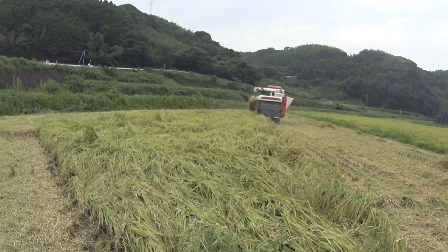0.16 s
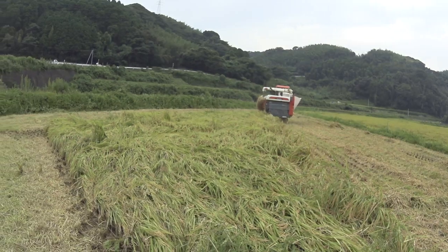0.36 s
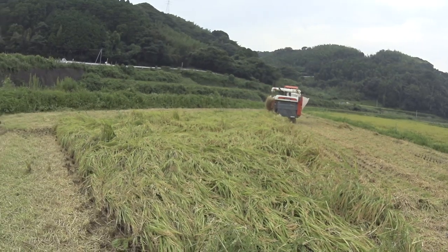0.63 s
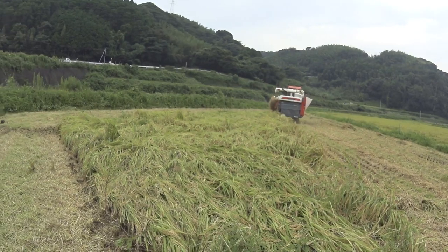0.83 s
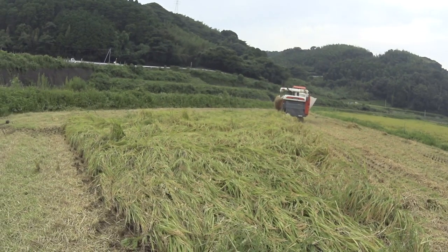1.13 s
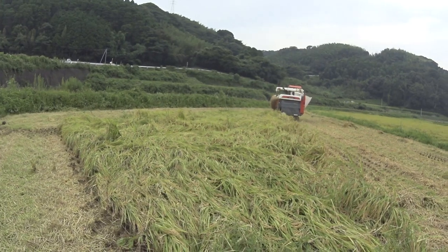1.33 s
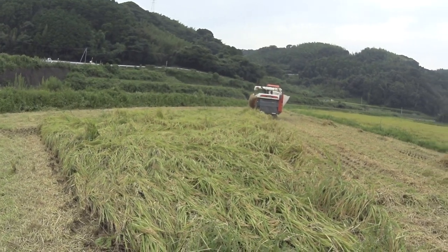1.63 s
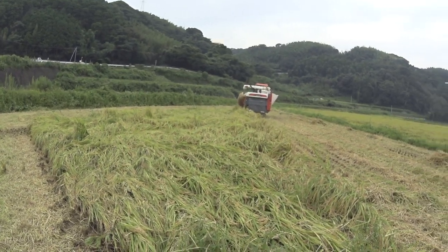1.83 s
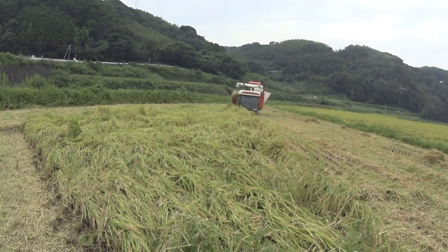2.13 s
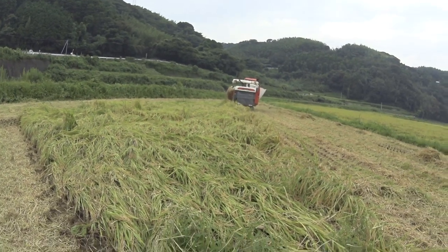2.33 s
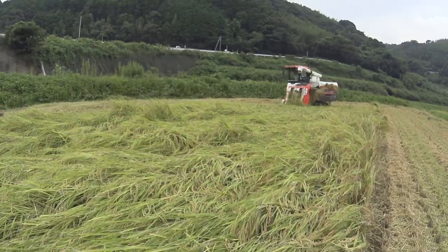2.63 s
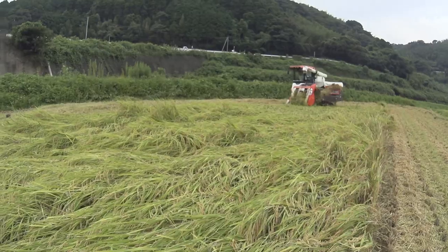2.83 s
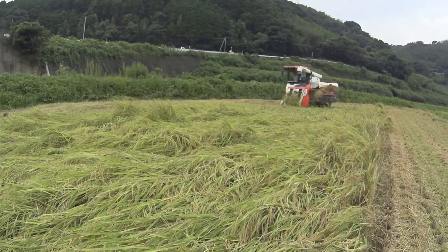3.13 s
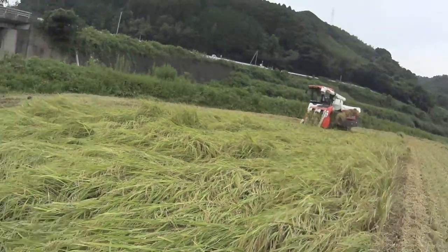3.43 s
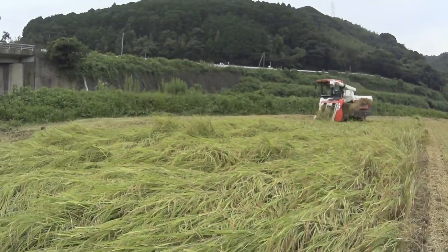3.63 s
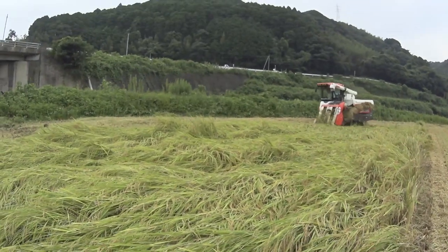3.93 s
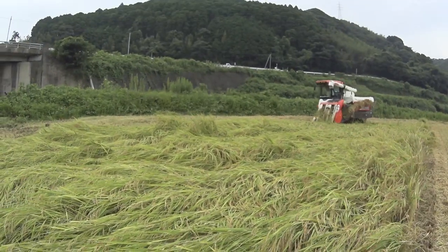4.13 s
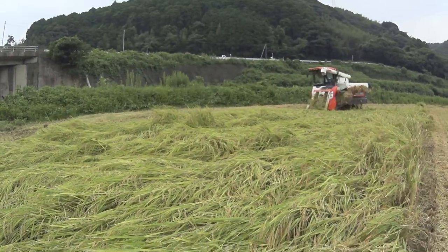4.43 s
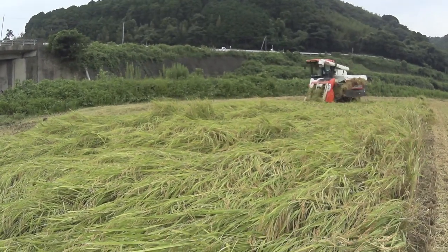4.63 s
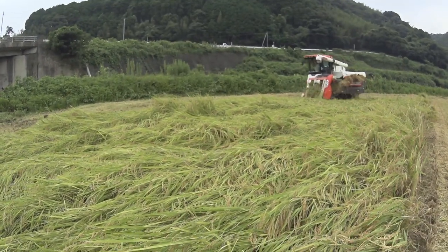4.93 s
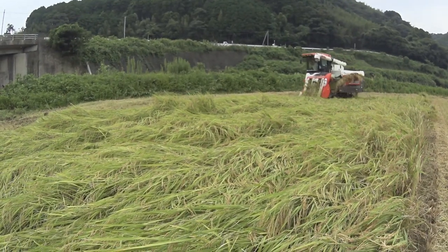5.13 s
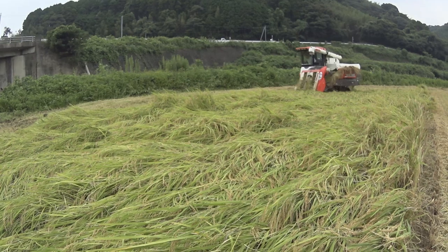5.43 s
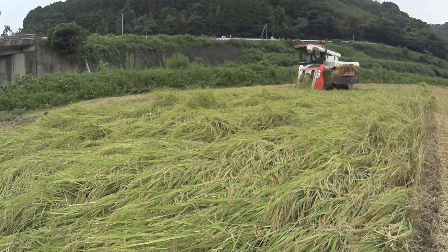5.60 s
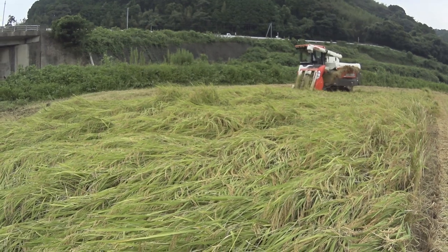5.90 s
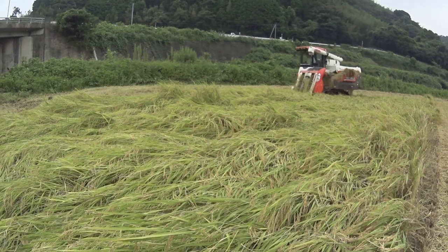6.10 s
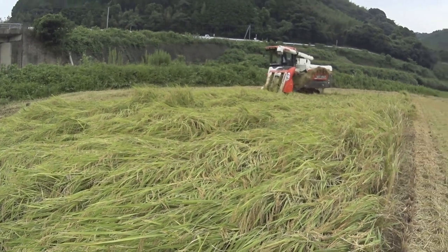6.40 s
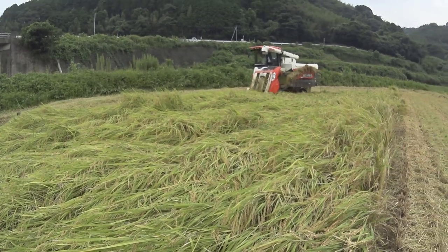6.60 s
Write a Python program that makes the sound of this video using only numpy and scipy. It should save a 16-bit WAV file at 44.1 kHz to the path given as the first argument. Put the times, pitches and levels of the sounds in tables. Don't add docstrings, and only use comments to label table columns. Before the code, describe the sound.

From 0 to about 2.2 seconds a combine harvester runs some distance away in an open field: low steady engine hum, dense broadband threshing noise, and a fast flutter of about eighteen knife strokes a second. A light knock on the camera housing comes near 2.2, then sharper ones at 2.5. At 2.55 the sound drops out for less than a tenth of a second. It returns abruptly louder and closer, with bassier exhaust. From 2.7 to 3.6 a hand settles its grip: hollow taps, low thumps, short scratchy rubs, hardest near 3.4. From 3.6 whining gears fade in and dry links chirp; from 3.8 a loose sieve plate rattles irregularly about eight times a second. The roar gradually swells until the end at 6.8, still running. The built-in stereo microphone sounds close, dull at the very top, and crunches on the loudest peaks.

```python
import sys
import numpy as np
from scipy import signal
from scipy.io import wavfile
from scipy.ndimage import uniform_filter1d

SR = 44100
rng = np.random.default_rng(int(sys.argv[2]) if len(sys.argv) > 2 else 0)


def to_linear_factor(level_db):
    exponent = np.asarray(level_db, float) / 20
    return 10 ** exponent


def put_to_file(sound):
    columns = np.atleast_2d(sound).T
    safe = np.clip(columns, -1, 1)
    whole_steps = np.round(safe * 32767)
    wavfile.write(sys.argv[1], SR, whole_steps.astype(np.int16))


N = 298099
BREAK_START, BREAK_END = 2.5495, 2.633


def evened(x):
    return x / np.sqrt(np.mean(x ** 2) + 1e-20)


def read(points, hz):
    f, value = np.transpose(points)
    return np.interp(np.log(hz + 1), np.log(f + 1), value)


def track(rows, t):
    s, *columns = np.transpose(rows)
    return [np.interp(t, s, c) for c in columns]


def add(mix, s, sound):
    part = mix[..., round(s * SR):][..., :sound.shape[-1]]
    part += sound[..., :part.shape[-1]]


def drift(size):
    return evened(uniform_filter1d(uniform_filter1d(rng.standard_normal(N), size), size))


def resonate(x, hz, width):
    r = np.exp(-np.pi * width / SR)
    return 2 * signal.lfilter([1 - r], [1, -r * np.exp(2j * np.pi * hz / SR)], x).real


def ring(x, hz, width):
    return evened(resonate(resonate(x, hz, width), hz, width))


def decaying(hz, width, u):
    return np.sin(2 * np.pi * hz * u) * np.exp(-np.pi * width * u)


def swing(hz, u, damp=1.45):
    return np.sin(2 * np.pi * hz * u) * np.exp(-(u * hz * damp) ** 2)


# t/s, roar level/dB
ROAR_LEVEL = [(0, -19.5), (.5, -20), (1.0, -20), (1.9, -20), (2.55, -22), (2.63, -17), (2.9, -17),
              (3.4, -16), (3.65, -17), (4.0, -14.5), (4.47, -13), (4.6, -13.5), (5.06, -12), (5.53, -13.5),
              (6.1, -12), (6.76, -11.5)]


def load(t):
    level_db = track(ROAR_LEVEL, t)[0]
    near = t > BREAK_START
    return level_db, near, level_db - np.where(near, -15, -19)


# multiple of engine speed, far level/dB, near level/dB
FIRING_ORDERS = [(.75, -77, -46.5), (1, -37.5, -39.5), (2, -42.5, -39), (2.25, -52.5, -58), (3, -52, -45.5),
                 (4.07, -54.5, -56.5), (4.66, -55.5, -56.5)]


def engine():
    t = np.arange(N) / SR
    _, near, surplus_db = load(t)
    turns = np.cumsum(93.5 + 0.344 * drift(6000)) / SR
    waver_db = np.where(near, 1.6, 1.1)
    hum = np.zeros(N)
    for order, far_db, near_db in FIRING_ORDERS:
        level_db = np.where(near, near_db, far_db) + 0.6 * surplus_db + waver_db * drift(3000)
        phase = 2 * np.pi * (order * turns + rng.random())
        hum += np.sqrt(2) * to_linear_factor(level_db) * np.sin(phase)
    return hum


WHINE_PITCHES = [652, 770, 2608, 4875, 6695, 7769, 8647]
# width/Hz, level against the roar/dB
WHINE_LINES = [(10, -31.5), (8, -40), (20, -18), (35, -11.5), (40, -14), (20, -27), (20, -42)]


def whines():
    t = np.arange(N) / SR
    lines = np.zeros(N)
    for hz, (width, db) in zip(WHINE_PITCHES, WHINE_LINES):
        line = evened(resonate(rng.standard_normal(N), hz, width))
        lines += to_linear_factor(db + 2.7 * drift(900)) * line
    fade_in = np.clip((t - 3.6) / 0.5, 0, 1)
    return lines * to_linear_factor(load(t)[0]) * fade_in


# t/s, peak level/dB, f/Hz, length/s
LINK_SQUEAKS = [(3.659, -13, 3980, 0.016), (3.686, -7, 4330, 0.011), (3.692, -10, 4050, 0.019),
                (4.238, -9, 3960, 0.019), (4.514, -11, 4000, 0.017), (4.527, -12, 4050, 0.014),
                (4.837, -13, 4200, 0.015), (4.8894, -10, 4100, 0.016), (5.0035, -10, 3940, 0.014),
                (5.064, -7.5, 3960, 0.015), (5.927, -6, 3690, 0.012), (6.043, -19, 3490, 0.0081),
                (6.159, -10, 4410, 0.017), (6.18, -7, 4300, 0.017), (6.241, -8.5, 4120, 0.012),
                (6.47, -8, 4120, 0.011)]


def squeaks():
    out = np.zeros(N)
    for s, db, hz, length in LINK_SQUEAKS:
        u = np.arange(0, max(length, 0.004), 1 / SR)
        add(out, s, to_linear_factor(db) * np.hanning(len(u)) * np.sin(2 * np.pi * hz * u))
    return out


# t/s, peak level/dB, f/Hz
SIEVE_RATTLE = [(3.833, -11, 1640), (3.9887, -11, 1704), (4.083, -6, 1590), (4.2026, -5, 1710),
                (4.3352, -9, 1638), (4.464, -8, 1670), (4.567, -8, 1810), (4.7155, -13, 1800),
                (4.8579, -9, 1720), (4.932, -5, 1680), (5.0755, -9, 1780), (5.17, -7, 1770),
                (5.2737, -15, 1770), (5.4246, -7, 1620), (5.5506, -5, 1666), (5.6365, -8, 1770),
                (5.6785, -4.5, 1650), (5.748, -18, 1730), (5.8075, -6, 1630), (5.9022, -8, 1777),
                (5.9782, -11, 1800), (6.061, -13, 1690), (6.1109, -6, 1770), (6.1668, -3, 1700),
                (6.277, -12, 1690), (6.3913, -3, 1670), (6.514, -7, 1742)]


def rattle():
    out, u = np.zeros(N), np.arange(900) / SR
    envelope = np.minimum(u / 0.0019, 1) * np.exp(-u / 0.004)
    for s, db, hz in SIEVE_RATTLE:
        add(out, s, to_linear_factor(db + 0.3) * envelope * np.sin(2 * np.pi * hz * u))
    return out


# start t/s, length/s, rumble level/dB, shell scrape level/dB,
# lid scrape level/dB, each at the firmest press
FINGER_RUBS = [(2.697, 0.039, -24, -14.5, -25), (2.869, 0.037, -16, -17, -12), (2.936, .035, -16, -20, -11),
               (3.004, 0.077, -8.5, -6, -13), (3.06, .085, -20, -16.5, -12), (3.159, .05, -20, -27, -34),
               (3.206, 0.053, -20.5, -14.5, -17.5), (3.244, 0.049, -17, -22, -26),
               (3.369, .06, -7.5, -2.5, -12.5), (3.411, 0.041, -16, -20, -18),
               (3.459, 0.067, -17.5, -18, -26)]


def rubs():
    out = np.zeros((2, N))
    slips_per_s = 1500
    for start, length, rumble_db, shell_db, lid_db in FINGER_RUBS:
        t = np.arange(0, length, 1 / SR)
        press = to_linear_factor(np.interp(t / length, [0, 0.47, 1], [-12.5, 0, -12.5]))
        happens = rng.random((3, len(t))) < slips_per_s / SR
        clicks = happens * rng.standard_normal((3, len(t)))
        slips = clicks[:2] * 0.89 + clicks[2]

        rumble = ring(slips, 237, 330) + 0.93 * ring(slips, 816, 260)
        rumble = evened(rumble + 0.55 * ring(slips.mean(0), 117, 130))
        sound = to_linear_factor(rumble_db - 1) * rumble * to_linear_factor([[2.2], [-2.2]])
        sound += to_linear_factor(shell_db - 1) * ring(slips, 1222, 177)
        lid = ring(slips, 2180, 250) + 1.26 * ring(slips, 1790, 320)
        sound += to_linear_factor(lid_db - 3.5) * lid * to_linear_factor([[-1.5], [1.5]])
        add(out, start, sound * press * signal.windows.tukey(len(t), 0.1))
    return out


# t/s, shell ring level/dB, thump level/dB, lid ring level/dB, tick level/dB
HOUSING_KNOCKS = [(2.1874, -3, -18.5, -26, -11.5), (2.4782, 3.5, -33, -19, -24),
                  (2.5056, -6, -27, -23, -10), (2.6947, -3, -20.5, -28, -37), (2.7289, -2, -26, -1.5, -22),
                  (2.8325, -3, -11, -22, -28), (2.859, -1, -31, -5, -28), (2.878, -3, -22, -7, -24),
                  (2.8858, -16, -32, 0.5, -21), (2.9569, 1.5, -24, -8, -11), (3.0099, -2, -16, -13, -8),
                  (3.165, -2, -23, -30, -17), (3.1846, -12, -29, -21, -26), (3.1961, -8, -31, -29, -28),
                  (3.362, 9.5, -18, -17, -27), (3.475, 3.5, -11.5, -23, -18), (3.491, -1, -32, -26, -20),
                  (3.6093, -10, -11, -30, -25)]
# t/s, level/dB, swing f/Hz
GRIP_TUGS = [(3.207, -7, 111), (3.248, -9, 92), (3.261, -6.5, 80.5), (3.433, -9, 49.7), (3.508, -17, 90),
             (2.182, -23, 110), (2.205, -17, 120), (4.221, -10, 260), (4.285, -12, 200), (4.841, -17, 200),
             (4.49, -23, 74.5), (4.77, -22, 120)]


def knocks():
    low, high, u = np.zeros(N), np.zeros(N), np.arange(1600) / SR
    shell = decaying(1252, 220, u) + to_linear_factor(-8.5) * decaying(1570, 297, u)
    shell *= np.minimum(u / 0.00036, 1)
    lid = decaying(2255, 157, u) * np.minimum(u / 0.00076, 1)
    thump = swing(143, u, damp=1.2) + 0.5 * swing(270, u)
    tick = swing(540, u, damp=1.36)
    for s, shell_db, thump_db, lid_db, tick_db in HOUSING_KNOCKS:
        add(low, s - 0.001, to_linear_factor(thump_db + 6.5) * thump + to_linear_factor(tick_db + 3) * tick)
        add(high, s + 0.00038, -to_linear_factor(shell_db) * shell - to_linear_factor(lid_db + 5.5) * lid)
    for s, db, hz in GRIP_TUGS:
        add(low, s, -to_linear_factor(db) * swing(hz, u))
    snap = evened(resonate(rng.standard_normal(900), 4600, 5000)) * np.exp(-u[:900] / 0.0033)
    add(high, 2.849, to_linear_factor(-5) * snap)
    return low * to_linear_factor([[2.5], [-2.5]]) + high * to_linear_factor([[0.3], [-0.3]])


# f/Hz, level per Hz/dB
FAR_COLOUR = [(15, -55), (25, -27), (64, -24), (75, -9), (96, -2), (120, -4.5), (192, -5), (286, -6.5),
              (340, -20), (375, -11.5), (716, -12.5), (1330, -8.5), (3690, -12), (4740, -8.5),
              (9500, -24.5), (12400, -55), (20900, -120)]
# f/Hz, level per Hz/dB
NEAR_COLOUR = [(15, -49), (25, 3), (96, -34), (120, -21), (187, -6.5), (308, -18), (753, -12), (1010, -14),
               (1270, -8.5), (1750, -9), (1980, -10.5), (2300, -4), (3790, -7.5), (4740, -3.5),
               (9500, -20.5), (12400, -51), (20900, -120)]
# f/Hz, width/Hz, far lift/dB, near lift/dB
PANEL_MODES = [(1279, 65, 5.5, 8), (1700, 380, -0.5, 4.5), (1826, 41, 8, 2.5), (2653, 44, 6, 2),
               (3120, 61, 7, 2), (3450, 140, 2, 1), (4590, 260, 2.5, 3), (4950, 230, 4, 1),
               (6210, 460, 7, 4), (6730, 156, 3.5, 4.5), (1926, 80, -5, -4)]
# t/s, f/Hz, depth/dB
GROUND_ECHO = [(0, 745, 11.5), (2.55, 754, 12), (3.6, 1020, 3.5), (4.3, 830, 10.5), (5, 760, 7.5),
               (6.76, 755, 8)]
# f/Hz, correlation/1
PORT_LIKENESS = [(60, 0.8), (110, 0.87), (190, 0.86), (340, 0.87), (620, 0.6), (1110, 0.98), (1980, 0.96),
                 (3550, 0.91), (6360, 1), (11400, 0.79)]
# f/Hz, left minus right level/dB
PORT_BALANCE = [(60, 4), (130, 2), (270, 3.5), (570, 2), (1200, 1), (2540, -1.5), (5380, 0), (11400, -4)]
# f/Hz, left lead/rad
PORT_PHASE = [(0, 0.04), (1720, 0.11), (2330, -0.79), (2580, 0.19), (3190, -0.22), (3880, 0.2),
              (4220, -0.0), (5940, -0.46), (7410, -0.5), (11500, 0.25)]


def roar():
    frames, hz = N // 128 + 5, np.fft.rfftfreq(1024, 1 / SR)[:, None]
    t = np.arange(frames) * 128 / SR
    level_db, near, surplus_db = load(t)

    colour = np.where(near, read(NEAR_COLOUR, hz), read(FAR_COLOUR, hz))
    top_hz = 9710
    top_db = np.where(near, -12, -16.5) - 3.5 * (hz - top_hz) / 1000
    colour = np.where(hz > top_hz, top_db, colour)
    for f, width, far_db, near_db in PANEL_MODES:
        colour = colour + np.where(near, near_db, far_db) / (1 + (2 * (hz - f) / width) ** 2)
    notch_hz, notch_db = track(GROUND_ECHO, t)
    colour -= notch_db / (1 + ((hz - notch_hz) / 70) ** 2)
    band = (hz[:, 0] > 3000) & (hz[:, 0] < 9000)
    colour -= 10 * np.log10((to_linear_factor(colour[band]) ** 2).sum(0))

    bass_db = np.where(near, -15.5, -27) + 0.37 * surplus_db
    grip_db = 4 * ((t > 2.86) & (t < 3.45))
    colour += (bass_db - level_db + grip_db) / (1 + (hz / 900) ** 4)

    a, b, c, d, patches = rng.standard_normal((frames, 513, 5)).T
    patches = uniform_filter1d(patches, size=14, axis=0)
    patches = evened(uniform_filter1d(patches, size=16, axis=1))
    patch_db = (np.where(near, 1.2, 0.8) + 1.03 * (hz > 6400)) * patches
    same = np.clip(read(PORT_LIKENESS, hz), -1, 1)
    left = a + 1j * b
    right = same * left * np.exp(-1j * read(PORT_PHASE, hz)) + np.sqrt(1 - same ** 2) * (c + 1j * d)
    lean = to_linear_factor(read(PORT_BALANCE, hz) / 2)
    z = np.array([left * lean, right / lean]) * to_linear_factor(colour + level_db + patch_db)
    return to_linear_factor(4) * signal.istft(z, nperseg=1024, noverlap=896)[1][:, :N]


# t/s, depth/dB, recovery/s
TREBLE_DUCKS = [
    (2.73, 6.5, 0.049),
    (2.86, 5, 0.051),
    (3.363, 12, 0.025),
    (3.476, 10, 0.018),
]


def duck(t):
    fall = 0.0023
    total_db = 0
    for s, db, back in TREBLE_DUCKS:
        recovery = 1 - (t - s - fall) / back
        total_db = total_db - db * np.clip(np.minimum((t - s) / fall, recovery), 0, 1)
    return total_db


# t/s, left minus right level/dB
BEARING = [
    [(0.0, -1.5), (1.19, -2), (2.52, 0), (2.55, 0)],
    [(2.63, -3), (3.15, -3.5), (3.4, -3.5), (3.72, -3.5), (6.19, -2.5), (6.76, -1)],
]


def knife(x):
    t = np.arange(N) / SR
    depth_db = np.where(load(t)[1], 4, 2)
    stroke = (t - 5.876) * 18
    force = rng.uniform(0.53, 1.65, 200)[np.floor(stroke).astype(int)]
    beat_db = depth_db * (force * np.exp(-(stroke % 1) / 0.2) - 0.2)
    lift_db = beat_db + 0.45 * drift(200) + duck(t)
    bass = signal.sosfiltfilt(signal.butter(2, 1900, fs=SR, output="sos"), x)
    lean = to_linear_factor((track(np.vstack(BEARING), t)[0] + 1.27) / 2)
    return bass + (x - bass) * to_linear_factor(lift_db) * [lean, 1 / lean]


def scene():
    drives = whines() + squeaks() + rattle()
    machine = engine() * to_linear_factor([[0.8], [-0.8]]) + drives * to_linear_factor([[-0.7], [0.7]]) + knife(roar())
    return machine + rubs() + knocks()


def low_pass(x):
    return signal.sosfilt(signal.butter(12, 16000, fs=SR, output="sos"), x)


def record(dry):
    over = np.maximum(np.abs(dry) - 0.75, 0)
    x = dry - np.sign(dry) * (over - 0.39 * np.tanh(over / 0.43))
    lowpass = signal.firwin(1023, 11080, window=("kaiser", 10), fs=SR)
    x = signal.oaconvolve(x, lowpass[None], "same")

    t = np.arange(N) / SR
    since = t - BREAK_START
    tail = np.cos(np.pi / 2 * np.clip(since / 0.02, 0, 1)) * (since > 0)
    silent = (since > 0) & (t < BREAK_END)
    x = x * np.where(silent, tail * to_linear_factor(-51 - 1500 * np.abs(since)), 1)
    x += tail * to_linear_factor(-34) * np.sin(2 * np.pi * 2120 * t)
    return low_pass(np.clip(x, -1, 1))


dry = scene()
out = record(dry)
put_to_file(out)
```